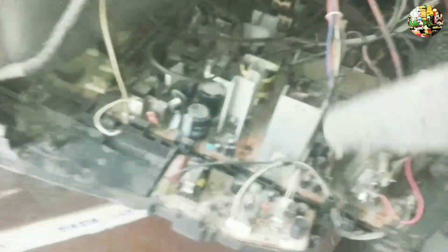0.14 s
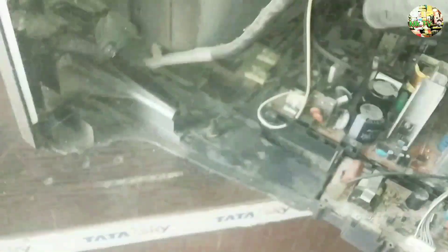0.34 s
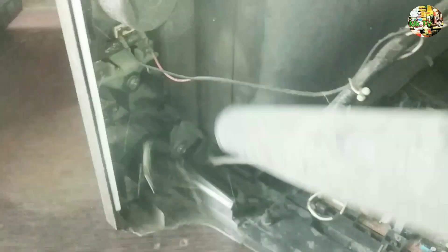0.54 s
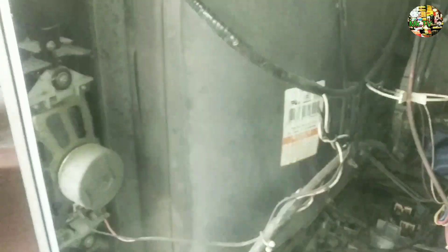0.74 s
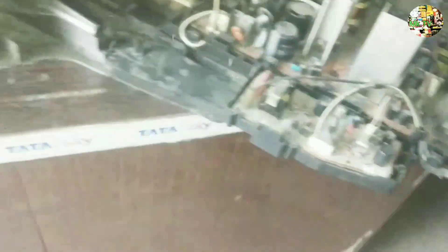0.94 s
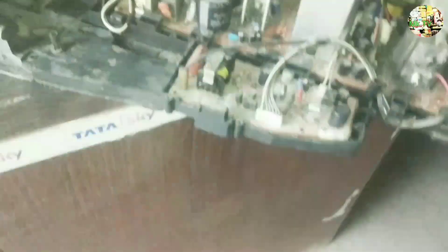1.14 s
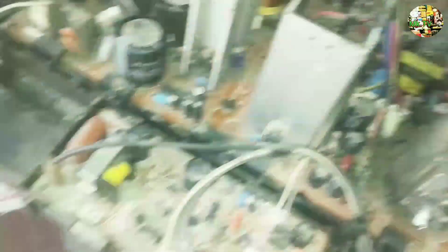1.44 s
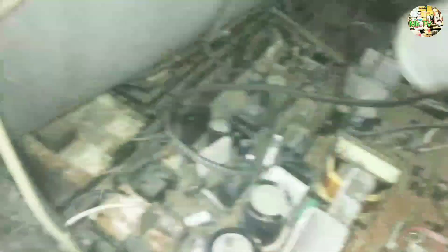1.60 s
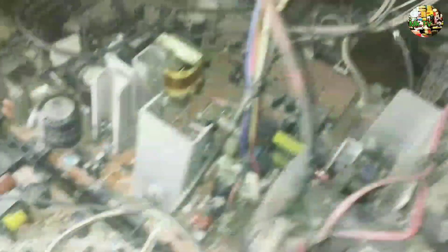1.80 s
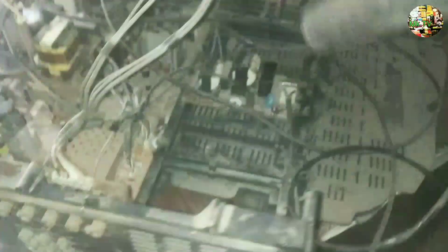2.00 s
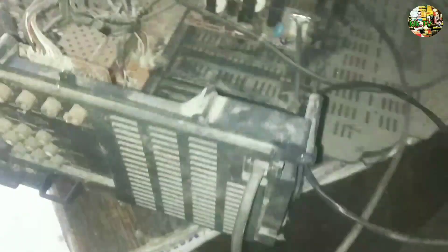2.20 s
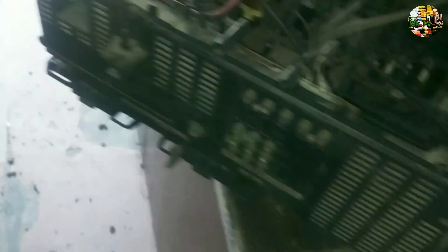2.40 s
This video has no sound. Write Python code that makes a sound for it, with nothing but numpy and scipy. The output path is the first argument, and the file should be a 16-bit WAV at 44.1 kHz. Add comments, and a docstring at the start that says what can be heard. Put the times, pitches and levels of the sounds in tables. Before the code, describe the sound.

An electric blower starts at about 0.1 seconds, close by, rising quickly to a high whine with a low hum and a strong hiss of air. The jet roars briefly in the hollows of an electronic chassis around 0.6 seconds. The pitch sags at 0.8, 1.9, 2.0 and 2.3 seconds, then the motor winds down from 2.4. Stray air softly thumps the microphone over faint workshop noise.

```python
"""An electric blower clears dust from an open chassis in a workshop, close to the microphone.
Its fan whines on two shaft orders, whose pitch sags whenever the speed does; a hum of two beating
tones is loud only near full speed. The turbulent jet hisses, rushes over the parts and excites
the resonances of hollows. Stray air thumps on the microphone, over faint room noise."""
import sys
import numpy as np
from scipy import signal
from scipy.fft import rfft, irfft, next_fast_len
from scipy.io import wavfile
from scipy.ndimage import uniform_filter1d, map_coordinates

SR = 44100
rng = np.random.default_rng(int(sys.argv[2]) if len(sys.argv) > 2 else 0)


def store_wav(level_fs):
    """Save 16-bit WAV to argv[1]."""
    pcm = np.round(np.clip(np.atleast_2d(level_fs), -1, 1) * 32767)
    wavfile.write(sys.argv[1], SR, pcm.T.astype(np.int16))


N = 112454
TIME = np.arange(N) / SR


def amp(db):
    """Amplitude grows tenfold every 20 dB."""
    return 10 ** (np.asarray(db) / 20)

def unit(x):
    """Normalisation to an rms of 1."""
    return x / np.sqrt(np.mean(np.abs(x) ** 2) + 1e-20)

def curves(rows):
    """Linear interpolation in time of each column after the first."""
    times, *columns = np.transpose(rows)
    return [np.interp(TIME, times, column) for column in columns]

def swell(centre_s, db, width_s):
    """A Gaussian envelope; the width is its standard deviation."""
    return amp(db) * np.exp(-.5 * ((TIME - centre_s) / width_s) ** 2)

def onset(start_s=.11, attack_s=.013):
    """A linear attack as the blower starts."""
    return np.clip((TIME - start_s) / attack_s, 0, 1)

def wobble(per_s):
    """Smooth modulation: a spline through random values."""
    return map_coordinates(rng.standard_normal(N // 8), [TIME * per_s], mode="wrap")

def phasor(hz):
    """Phase is the integral of frequency, here from a random start."""
    return np.exp(2j * np.pi * (np.cumsum(np.broadcast_to(hz, N)) / SR + rng.random()))

def filtered(x, response):
    """Filtering multiplies the spectrum by a frequency response."""
    size = next_fast_len(N + SR // 4)
    return irfft(rfft(x, size) * response(np.fft.rfftfreq(size, 1 / SR)), size)[:N]

def coloured(x, spectrum):
    """Spectral shaping, interpolated in log frequency, at rms 1."""
    points_hz, db = np.transpose(spectrum)
    return unit(filtered(x, lambda hz: amp(np.interp(np.log(hz + 1), np.log(points_hz + 1), db))))

def noise(spectrum):
    """Stationary Gaussian noise of a given spectrum."""
    return coloured(rng.standard_normal(N), spectrum)

def eddies(spectrum, patchy_db):
    """Turbulence as noise whose gain varies in patches of time and frequency."""
    cells = signal.stft(rng.standard_normal(N), nperseg=1024)[2]
    patches = uniform_filter1d(rng.standard_normal(cells.shape), size=6, axis=0)
    patches = uniform_filter1d(patches, size=5, axis=1)
    return coloured(signal.istft(cells * amp(patchy_db * unit(patches)))[1][:N], spectrum)


# Room noise spectrum. Each row: frequency in Hz, relative level in dB.
ROOM_SPECTRUM = [(18, -28), (30, -11.5), (73, -11), (180, -32), (394, -17.5), (881, -31), (2310, -26.5),
                 (12200, -37), (15000, -43)]

def workshop():
    """The noise floor is steady and strongest in the bass."""
    return amp(-42.5) * noise(ROOM_SPECTRUM)


# Puffs of stray air. Each row: centre in seconds, level in dB, width in seconds.
PUFFS = [(0.092, -32.5, 0.032), (.17, -39, .025), (.49, -36, 0.025), (0.65, -34.5, 0.027),
         (.82, -38, 0.025), (1.402, -28, .025), (2.005, -34, .02), (2.44, -32, .03), (2.53, -25, .03)]
# Their spectrum. Each row: frequency in Hz, relative level in dB.
PUFF_SPECTRUM = [(15, -1), (35, -5), (60, -3), (90, -7.5), (160, -15), (600, -44)]

def puffs():
    """Wind noise: air striking the microphone makes slow pressure swings, heard as thumps."""
    return noise(PUFF_SPECTRUM) * sum(swell(*puff) for puff in PUFFS)


# Hollows. Each row: centre in seconds, level in dB, width in seconds, resonance in Hz.
HOLLOWS = [(0.562, -22, 0.034, 949), (0.662, -24, 0.036, 1551), (1.406, -29, .025, 1452)]
# Resonance shape. Each row: distance from the resonance in Hz, relative level in dB.
HOLLOW_SKIRT = [(20, 3), (220, 2), (400, -8), (700, -34), (2000, -70)]

def chassis():
    """Cavity resonance makes hollows roar as the jet crosses them; an edge tone whistles once."""
    roars = sum(swell(centre_s, db, width_s) * unit(noise(HOLLOW_SKIRT) * phasor(hz).real)
                for centre_s, db, width_s, hz in HOLLOWS)
    whistle = swell(centre_s=1.832, db=-25, width_s=.007) * unit(phasor(hz=2890).real)
    return roars + whistle


# Envelopes of nozzle hiss and of air on the chassis. Each row: time in seconds, relative level in dB.
HISS_LEVELS = [(0.12, -22.5), (0.35, -19.5), (0.62, -22), (0.63, -16.5), (0.66, -16.5), (0.68, -20),
               (0.94, -22), (0.96, -19.5), (1.03, -22.5), (1.09, -18.5), (1.12, -21), (1.17, -16.5),
               (1.19, -19.5), (1.58, -22), (2.38, -21), (2.39, -18.5), (2.51, -33.5), (2.55, -36)]
RUSH_LEVELS = [(0.12, -23.5), (0.15, -23.5), (0.15, -28), (0.5, -25), (0.55, -23), (0.57, -24),
               (0.8, -23.5), (0.92, -28.5), (0.94, -25), (1.99, -27), (1.99, -20.5), (2.11, -28.5),
               (2.3, -23), (2.3, -24.5), (2.38, -25.5), (2.4, -21), (2.46, -37), (2.55, -39)]
# Their spectra. Each row: frequency in Hz, relative level in dB.
HISS_SPECTRUM = [(300, -40), (1500, -27), (2650, -2.5), (3000, -4.5), (3350, -7.5), (3750, 2), (4600, 0.5),
                 (5100, -2), (5600, -2), (6200, -4.5), (6900, -5.5), (7700, 0), (9500, -1.5), (11800, -1),
                 (14000, -5), (15500, -9.5)]
RUSH_SPECTRUM = [(30, -19), (100, -7), (300, 0.5), (480, -1), (660, 0), (900, -3), (1250, -1), (1700, -0.5),
                 (2200, 1), (2700, -4), (3300, -6.5), (8000, -35)]
# Emphasis of one treble band of the jet. Each row: time in seconds, gain at its centre in dB.
BAND_GAINS = [(.12, 4), (.25, 0), (.9, -1), (1.7, 1), (1.9, -1), (2.08, 0.5), (2.22, -7), (2.45, -2)]
BAND_HZ, BAND_WIDTH_HZ = 2900, 380

def jet():
    """Turbulence radiates broadband noise and modulates the hiss and the rush together."""
    (hiss_db,), (rush_db,), (band_db,) = curves(HISS_LEVELS), curves(RUSH_LEVELS), curves(BAND_GAINS)
    flutter_db = 1.24 * wobble(per_s=190) + 1.67 * wobble(per_s=450)
    hiss = unit(amp(flutter_db) * eddies(HISS_SPECTRUM, patchy_db=2.2))
    rush = unit(amp(.86 * flutter_db) * eddies(RUSH_SPECTRUM, patchy_db=1.6))
    air = amp(hiss_db + .5) * hiss + amp(rush_db + 4) * rush
    band = filtered(air, lambda hz: np.exp(-.5 * ((hz - BAND_HZ) / BAND_WIDTH_HZ) ** 2))
    early_hiss = noise(HISS_SPECTRUM) * swell(centre_s=.035, db=-38.5, width_s=.0085)
    return early_hiss + onset() * (air + (amp(band_db) - 1) * band)


# The hum's two tones. Each row: time in seconds, frequency in Hz, relative level in dB.
HUM_LOW = [(.16, 195.3, -15.5), (.2, 201.8, -18), (.255, 225, -15.5), (.45, 219.9, -16.5),
           (.65, 211.2, -15), (.85, 209, -20), (1.12, 207.2, -16), (1.25, 203, -23), (1.42, 207, -19),
           (1.5, 196, -20.5), (1.8, 187, -23), (1.95, 199, -15), (2.05, 192, -16.5), (2.15, 190, -34),
           (2.32, 184, -14), (2.39, 203, -24.5)]
HUM_HIGH = [(.6, 250, -45), (.88, 240, -25), (1.05, 249.7, -28), (1.2, 259.1, -29), (1.36, 246, -23.5),
            (1.7, 251.3, -24), (1.8, 242, -17.5), (1.88, 229.6, -18.5), (1.97, 215, -33),
            (2.06, 218.9, -23.5), (2.11, 233, -14), (2.19, 240, -14.5), (2.245, 218.2, -11.5),
            (2.38, 236.6, -38)]
# Envelope of its noisy part. Each row: time in seconds, relative level in dB.
HUM_NOISE_LEVELS = [(.17, -16.5), (.3, -24.5), (.55, -27), (.8, -18.5), (1.05, -21.5), (1.55, -19),
                    (1.9, -17.5), (2.15, -19.5), (2.35, -20.5)]
# Spectrum of that part. Each row: frequency in Hz, relative level in dB.
HUM_NOISE_SPECTRUM = [(20, -73), (100, -35), (150, -11), (180, -2.5), (220, -1), (258, -4), (300, -15),
                      (400, -47), (900, -90)]
HUM_ONSET_HZ, HUM_ONSET_WIDTH_HZ = 1860, 87  # in terms of the main whine's pitch

def hum(speed_hz, saturation=.29, compression=.68, settle_s=.019):
    """Two close tones beat in a band of noise; the sum fades as the fan slows."""
    (low_hz, low_db), (high_hz, high_db) = curves(HUM_LOW), curves(HUM_HIGH)
    noise_db, = curves(HUM_NOISE_LEVELS)
    wave = amp(low_db) * phasor(low_hz) + amp(high_db) * phasor(high_hz)
    wave += amp(noise_db) * signal.hilbert(noise(HUM_NOISE_SPECTRUM)) / np.sqrt(2)
    power = amp(low_db) ** 2 + amp(high_db) ** 2 + amp(noise_db) ** 2
    # Saturation rounds off the fast beats; compression evens out the slower swells.
    wave /= np.sqrt(1 - saturation + saturation * np.abs(wave) ** 2 / power)
    slow_power = np.abs(uniform_filter1d(np.abs(wave) ** 2 / power, size=int(settle_s * SR)))
    wave /= np.sqrt(1 - compression + compression * slow_power)
    third_harmonic = amp(-22) * np.abs(wave) * np.cos(3 * np.angle(wave))
    at_speed = .5 + .5 * np.tanh((speed_hz - HUM_ONSET_HZ) / (2 * HUM_ONSET_WIDTH_HZ))
    gain = at_speed + amp(-14) * (1 - at_speed) * (speed_hz / HUM_ONSET_HZ) ** 2
    return np.sqrt(2) * onset() * gain * (wave.real + third_harmonic)


# Whine envelopes. Each row: time in seconds, main order's level in dB, upper order's level in dB.
WHINE_LEVELS = [(.1, -60, -60), (.135, -25, -44), (.33, -22.5, -42), (.37, -29, -42), (.59, -24, -37),
                (.63, -33, -42), (.79, -26, -40), (.9, -24.5, -37), (1.15, -27, -33), (1.22, -33, -33),
                (1.49, -33, -30), (1.66, -23.5, -29), (1.705, -33, -22), (1.775, -25, -23),
                (1.82, -31, -33), (1.94, -25, -27), (2.05, -24, -31), (2.11, -33, -30), (2.18, -25, -32),
                (2.21, -28, -40), (2.38, -26, -31), (2.47, -55, -60)]

def whine(speed_hz, upper_ratio=1.195, flicker_db=3.2):
    """Shaft orders are proportional to speed: both share its jitter, but flicker separately in level."""
    main_db, upper_db = curves(WHINE_LEVELS)
    glide_hz_per_s = np.abs(np.gradient(speed_hz)) * SR
    jitter_hz = .011 * speed_hz + .0033 * glide_hz_per_s
    hz = speed_hz + jitter_hz * wobble(per_s=150)
    return np.sqrt(2) * sum(amp(db + flicker_db * wobble(per_s=70)) * phasor(ratio * hz).real
                            for ratio, db in [(1, main_db), (upper_ratio, upper_db)])


# Fan speed. Each row: time in seconds, pitch of the main whine in Hz.
FAN_SPEED = [(.11, 1150), (.137, 1390), (.158, 1820), (.2, 2190), (.25, 2260), (.6, 2240), (.745, 2235),
             (.785, 1760), (.805, 1760), (.83, 2070), (.89, 2210), (1.15, 2230), (1.68, 2215),
             (1.875, 2180), (1.918, 1760), (1.955, 2030), (2.003, 1480), (2.055, 2130), (2.19, 2200),
             (2.23, 1950), (2.26, 1550), (2.29, 1472), (2.325, 2020), (2.37, 2130), (2.41, 1750),
             (2.55, 800)]

def fan():
    """Rotation speed governs the pitch of the whine and the strength of the hum."""
    speed_hz, = curves(FAN_SPEED)
    return whine(speed_hz) + hum(speed_hz)


def scene():
    """Superposition: the pressures of all sources add in one channel."""
    return (workshop() + puffs() + chassis() + jet() + fan())[None]

def record(dry, cutoff_hz=15520):
    """Band limiting: an ideal low-pass filter removes the highest treble."""
    return np.array([filtered(channel, lambda hz: hz < cutoff_hz) for channel in dry])


dry = scene()
out = record(dry)
store_wav(out)
```